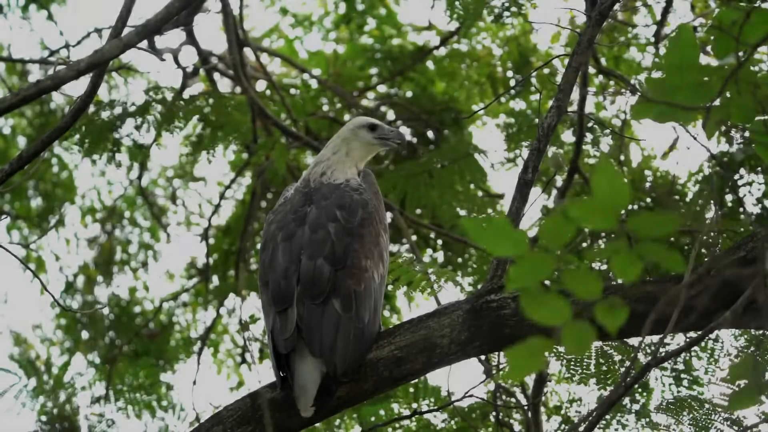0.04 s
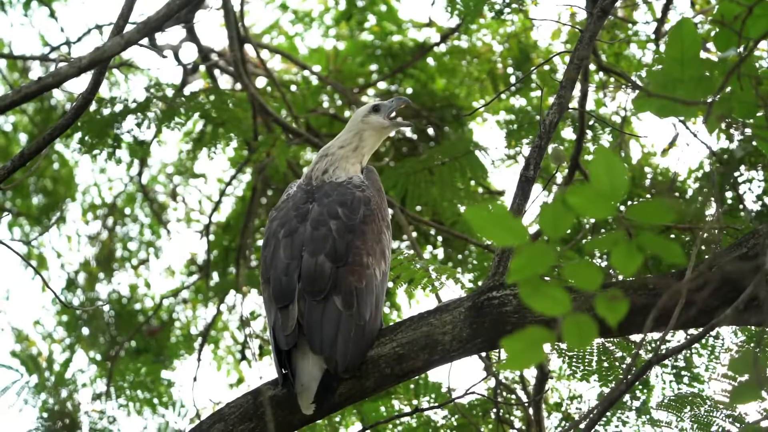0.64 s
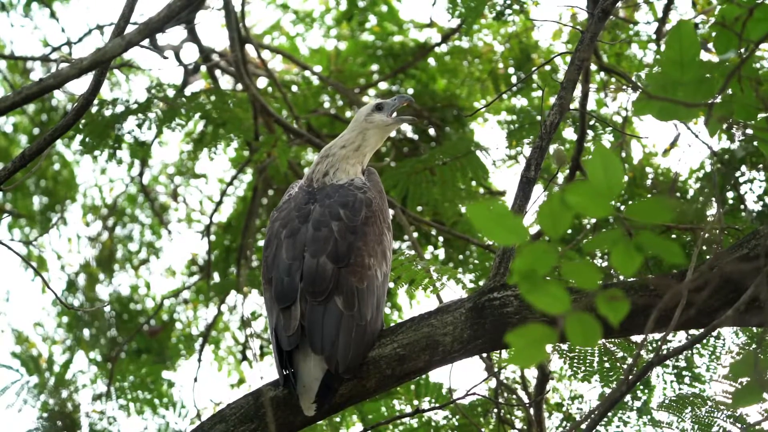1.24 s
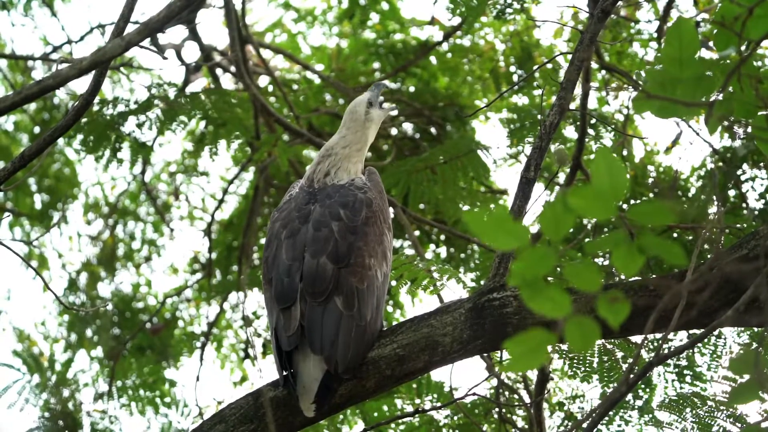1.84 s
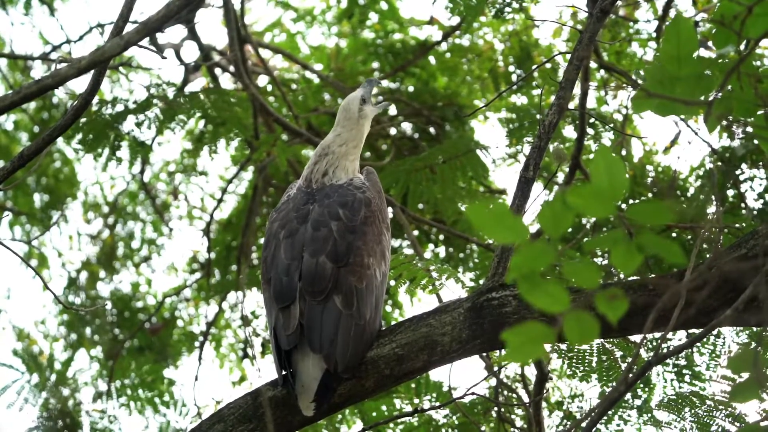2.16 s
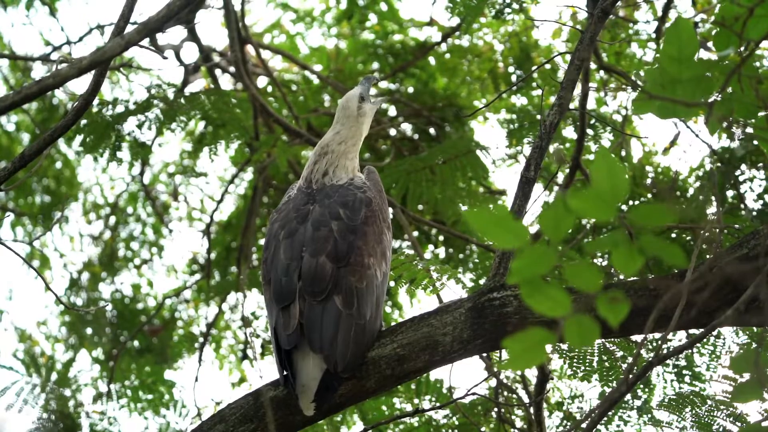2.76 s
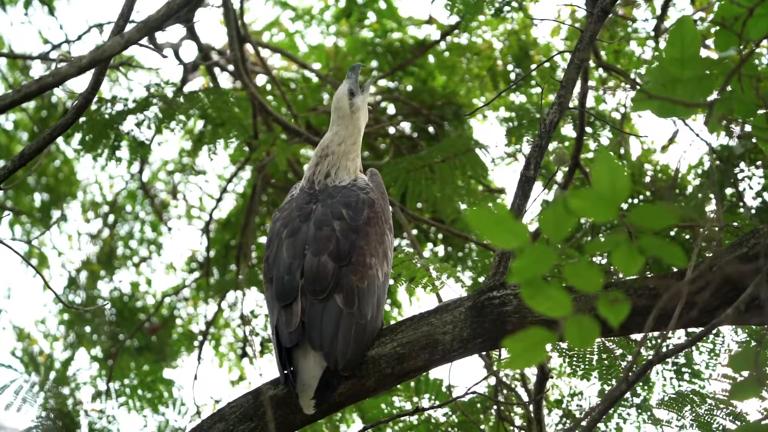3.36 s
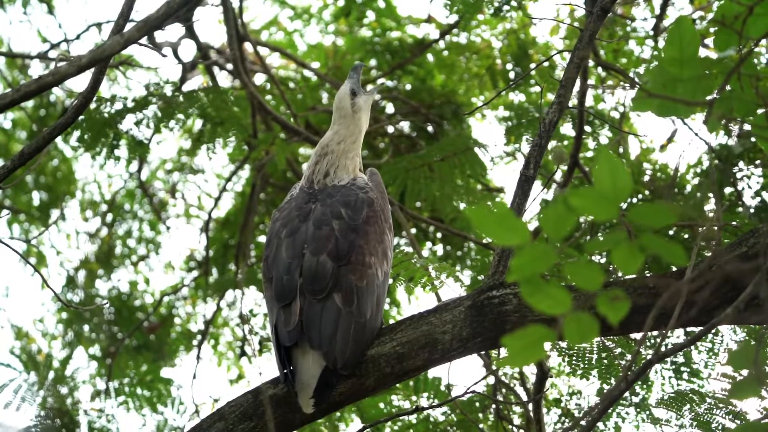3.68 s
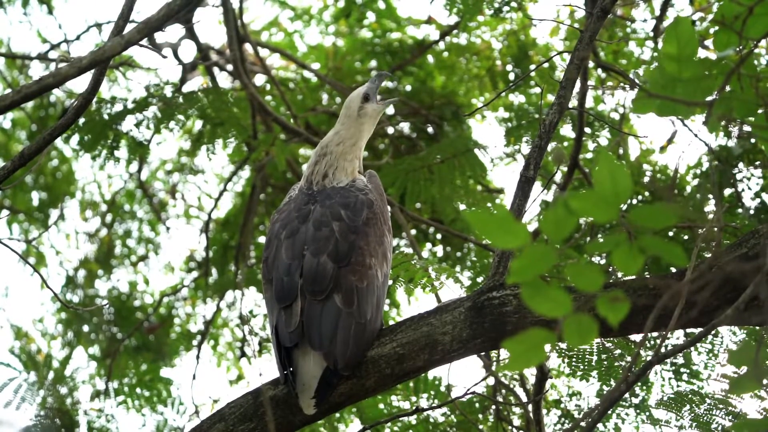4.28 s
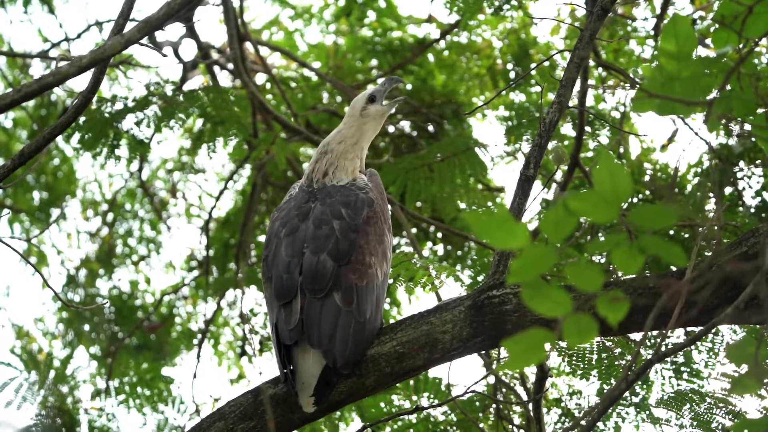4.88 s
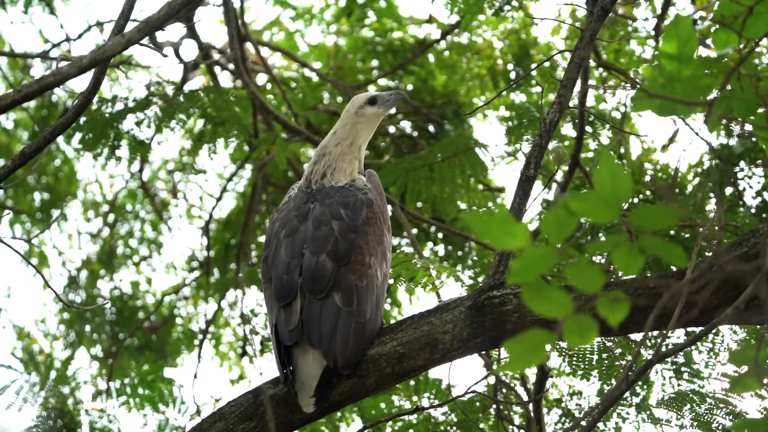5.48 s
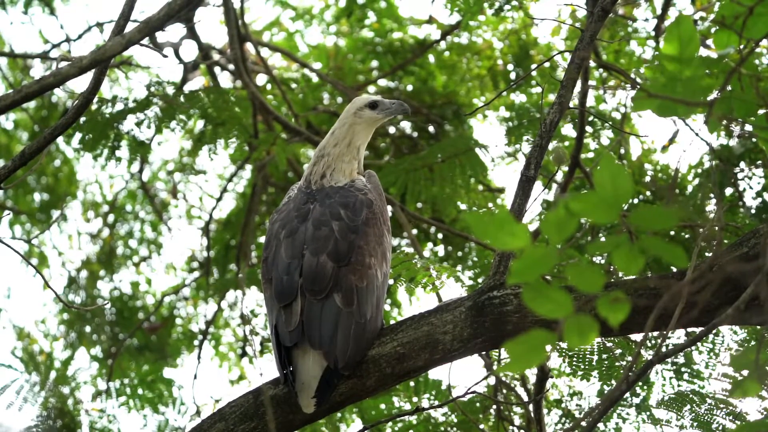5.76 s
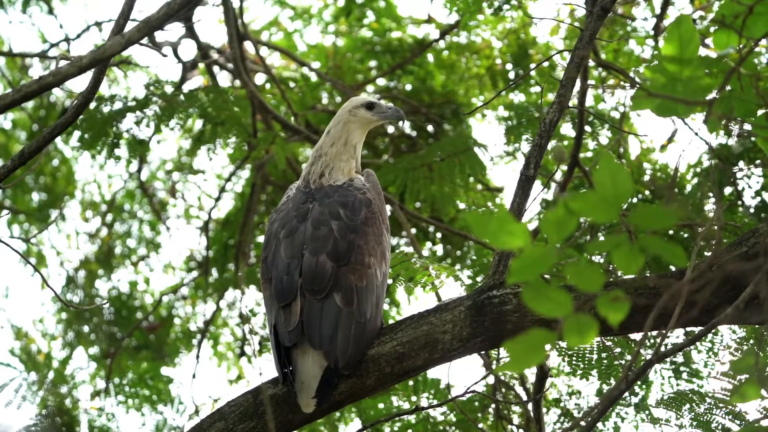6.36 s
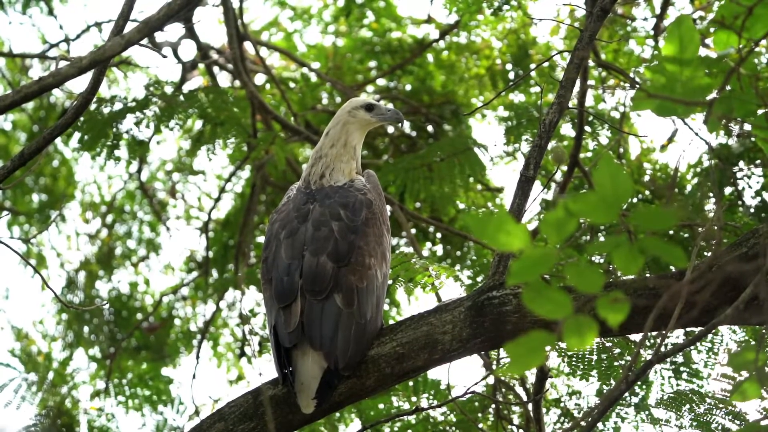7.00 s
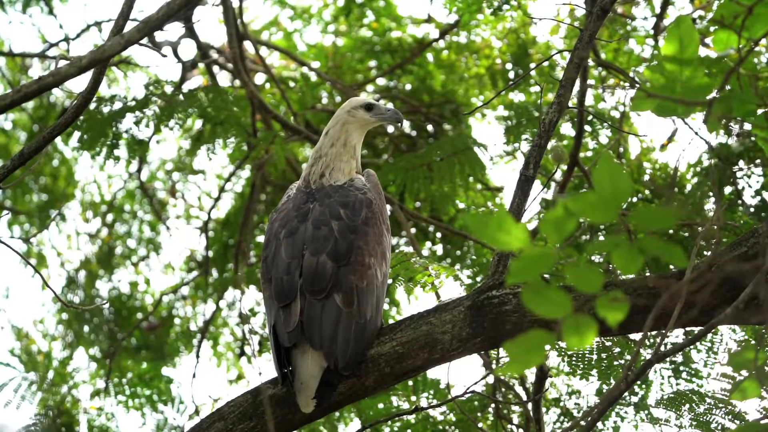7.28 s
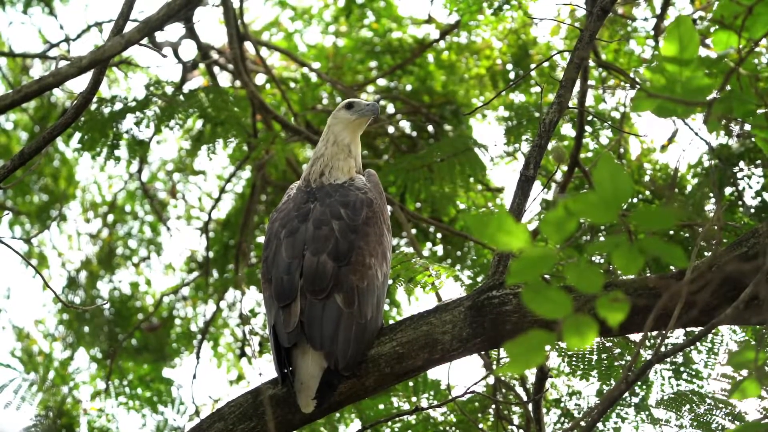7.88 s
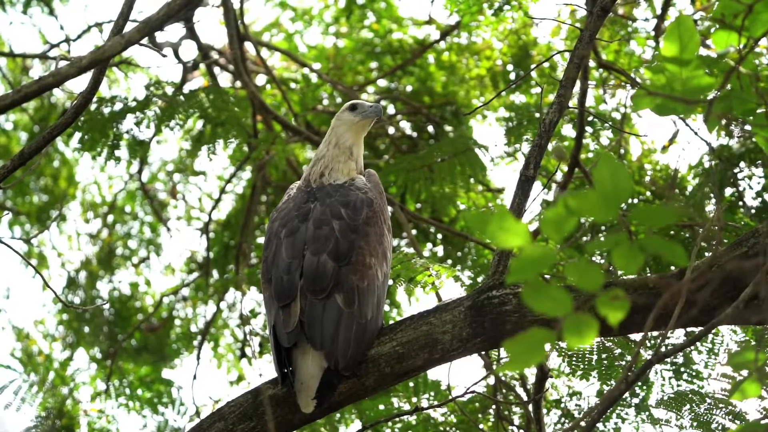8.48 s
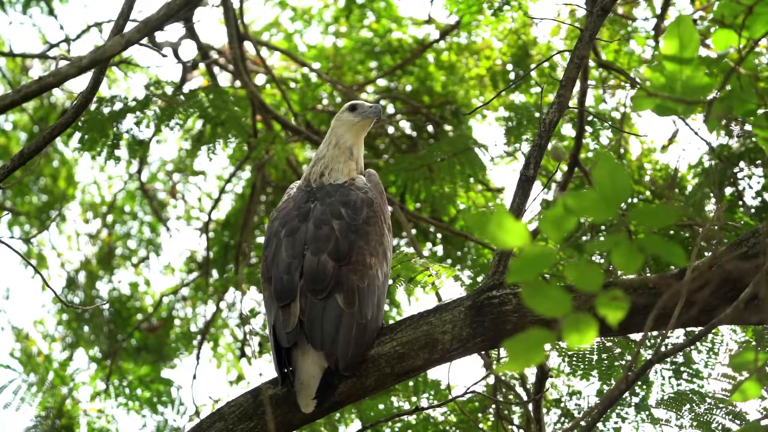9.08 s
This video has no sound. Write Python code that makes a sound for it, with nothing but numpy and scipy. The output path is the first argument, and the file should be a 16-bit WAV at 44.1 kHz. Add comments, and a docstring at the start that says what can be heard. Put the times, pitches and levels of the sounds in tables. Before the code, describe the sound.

An eagle gives loud, harsh honks and yelps outdoors, then a small bird chirps faintly over a distant engine throb.

```python
"""A sea eagle on a branch gives ten honks and four yelps, heard on a stereo microphone in a grove.
Membranes in its syrinx pulse and ring the throat: a honk creaks open, holds a clean pitch arch and
goes slack; a yelp climbs into a squeal and cracks into rasp. The trees scatter the sound back.
Further off a small bird repeats a chirping phrase, and something rustles softly.
Far away an engine throbs through its exhaust, under a wash of traffic and foliage."""
import sys
import numpy as np
from scipy import signal
from scipy.fft import rfft, irfft
from scipy.io import wavfile
from scipy.ndimage import uniform_filter1d, minimum_filter1d

SR = 44100
rng = np.random.default_rng(int(sys.argv[2]) if len(sys.argv) > 2 else 0)


def persist_wave(psi):
    """Save psi, clipped to +-1, as 16-bit WAV."""
    counts = np.round(np.clip(psi, -1, 1) * 32767).astype(np.int16)
    wavfile.write(sys.argv[1], SR, np.atleast_2d(counts).T)


N = 407484
TIME = np.arange(N) / SR
CALL_TIME = np.arange(12288) / SR
CLEAR_ROUGH = .025  # roughness of the eagle's clear voice, 0-1

# Honks from the branch: t/s, creak/s, voice/s, sag/s, top f/Hz, squeal/0-1, strain/0-1,
# then relative level/dB of the low, middle, upper and top register
HONKS = [(.788, .017, 0.08, .012, 438.4, 0.062, 0.92, -11, -17.5, -28, -40),
         (1.028, .014, .085, .011, 434.7, .06, 0.69, -12.5, -19, -30.5, -41),
         (1.291, 0.017, 0.078, .011, 435.2, 0.052, 0.83, -12.5, -19, -29, -40),
         (1.624, .023, .075, .015, 430.2, 0.16, 0.45, -11, -20.5, -31, -44),
         (1.907, .021, 0.099, .011, 433.5, 0.14, 0.55, -12.5, -20.5, -28, -40.5),
         (3.739, 0.025, 0.11, 0.0098, 431.7, 0.2, 0.87, -10, -17, -24.5, -34),
         (4.039, .022, 0.14, 0.0119, 434.5, 0.18, 1, -11.5, -20, -29.5, -36.5),
         (4.378, .019, 0.14, .011, 435, 0.095, 0.64, -12.5, -19.5, -28, -36.5),
         (4.861, 0.019, 0.051, .013, 422.5, 0.18, .3, -12.5, -20, -28.5, -40),
         (5.126, 0.017, 0.15, .010, 436, 0.099, 0.78, -12.5, -17.5, -27.5, -37)]
# Yelps from the branch: t/s, creak/s, clear voice/s, rasp/s, first f/Hz, top f/Hz, squeal/0-1,
# then relative level/dB of the four registers
YELPS = [(.380, .008, 0.035, 0.025, 422, 464.3, 0.16, -14.5, -13, -25.5, -38),
         (2.313, .007, 0.035, 0.044, 390.4, 452.8, 0.37, -14, -18, -27, -38),
         (2.957, .019, .046, 0.02, 403, 428.6, 0.57, -10, -19.5, -29, -36.5),
         (3.301, 0.0051, 0.051, 0.026, 396.4, 451.2, 0.88, -15, -16, -27, -38.5)]
# Late echo of the grove around the microphone: f/Hz, t60/s
GROVE_DECAY = [(400, 0.17), (1300, 0.75), (1720, 1.09), (2200, 1.04), (3000, 1.07), (3480, 1.03),
               (4100, 0.78), (6000, 1.05), (12000, 0.26)]
def eagle(direct_db=-2.5, near_db=-7.0, late_db=-22):
    """The calls reach the microphone directly, in quick echoes from the crown and in the grove's tail."""
    voice, crown = np.zeros(N), np.zeros((2, N))
    for start, sound in [honk(*row) for row in HONKS] + [yelp(*row) for row in YELPS]:
        add(voice, start, sound)
        # the head turns, so each call finds new echoes
        add(crown, start, scatter(sound, [(1500, .26), (9000, .24)], delay_s=.003, treble_db=5.5))
    grove = scatter(voice, GROVE_DECAY, delay_s=.06)
    return gain_of(direct_db) * ports(voice) + gain_of(near_db) * crown + gain_of(late_db) * grove


# Colour of a honk's stages: level/dB added to each of the four registers
BEAK_SHUT_DB = [-2, -5.5, -1.5, -11.5]
STRAIN_DB = [-5.5, 0.5, 1.5, 1.5]  # membranes at their tightest
SLACK_DB = [-17.5, -13, -11, -5]
def honk(start, creak, length, sag, top_hz, squeal, strain, *levels_db):
    """Pitch scoops up as the beak opens, the voice thins at the top of the arch, then sags and breaks."""
    scoop_hz, slack_hz = 22.44, 57.6
    scoop_share, strain_at, strain_width = .202, .6, .18  # shares of the length
    age = np.maximum(CALL_TIME - creak, 0)
    shut = np.exp(-age / (scoop_share * length))
    tight = np.exp(-((age / length - strain_at) / strain_width) ** 2)
    slack = np.exp(np.minimum(age - length, 0) / sag)
    hz = top_hz - scoop_hz * shut - slack_hz * slack
    broken = slack ** 3
    rough = CLEAR_ROUGH + .49 * broken
    colour_db = (np.outer(BEAK_SHUT_DB, shut) + np.outer(STRAIN_DB, strain * tight)
                 + np.outer(SLACK_DB, broken))
    return start, call(creak, length, hz, rough, squeal * (1 - tight), levels_db, colour_db)


# Colour of a yelp's beginning, height and cracked end: level/dB added to each of the four registers
SWELL_DB = [-4.5, -8, -12, -16]
SQUEAL_DB = [-3, 1, 3, -0.5]
RASP_DB = [1, -1, -1, 4]
def yelp(start, creak, clear, rasp, first_hz, top_hz, squeal, *levels_db):
    """Pitch climbs and locks into a squeal as the throat tightens, then cracks into a fading rasp."""
    rise_s, crack_s, tighten_s, fade_db_per_s = .017, .02, .02, -140
    age = np.maximum(CALL_TIME - creak, 0)
    shut = np.exp(-age / rise_s)
    strain = np.minimum(age / clear, 1) ** 2
    tight = ramp(age - .51 * clear, tighten_s)
    cracked = ramp(age - clear, crack_s)
    hz = top_hz + (first_hz - top_hz) * shut
    rough = CLEAR_ROUGH + .8 * cracked
    locked = squeal * (1 - shut) * (1 - .81 * cracked)
    colour_db = np.outer(SWELL_DB, shut) + np.outer(SQUEAL_DB, strain) + np.outer(RASP_DB, cracked)
    fade_db = fade_db_per_s * np.maximum(age - clear, 0)
    return start, call(creak, clear + rasp, hz, rough, locked, levels_db, colour_db + fade_db, tight)


# Borders between the low, middle, upper and top register: f/Hz
REGISTER_EDGES = [2550, 4300, 6000]
# Colour of the slack opening creak: level/dB added to each register
CREAK_DB = [-9.5, -10, -10.5, -14.5]
# Random waver of each register: rms depth/dB
WAVER_DB = [0.67, 1.23, 1.7, 0.93]
def call(creak, length, hz, rough, squeal, levels_db, colour_db, tight=0):
    """A call opens with a creak, then the voice catches; each register follows its own level."""
    attack_s, catch_s, release_s = .0097, .0062, .0057
    creak_hz, creak_rise_hz_per_s, creak_rough = 305.2, 2654, .5
    t = CALL_TIME
    caught = ramp(t - creak, catch_s)
    hz = caught * hz + (1 - caught) * (creak_hz + creak_rise_hz_per_s * t)
    rough = caught * rough + (1 - caught) * creak_rough
    pulses = syrinx(hz, np.clip(rough, 0, 1), np.clip(squeal, 0, 1))
    spectrum = throat(pulses, hz, tight)
    f = np.fft.rfftfreq(len(t), 1 / SR)
    lowpasses = [1 / (1 + (f / edge) ** 24) for edge in REGISTER_EDGES]
    registers = irfft(spectrum * np.diff(lowpasses, axis=0, prepend=0, append=1))
    registers /= np.sqrt(uniform_filter1d(registers ** 2, size=400) + 1e-12)  # each held at unit rms
    register_db = np.array(levels_db)[:, None] + caught * colour_db + np.outer(CREAK_DB, 1 - caught)
    waver_db = np.array([db * drift(len(t), hz=35) for db in WAVER_DB])
    gate = np.minimum(t / attack_s, 1) * np.exp(-np.maximum(t - creak - length, 0) / release_s)
    return gate * (gain_of(register_db + waver_db) * registers).sum(axis=0)


def syrinx(hz, rough, squeal, jitter=.032, flutter_db=3, sideband=1.4):
    """Membrane pulses, uneven and duller when rough; in a squeal every fourth harmonic takes over."""
    size, harmonic = len(hz), np.arange(1, 37)[:, None]
    cycles = np.cumsum(hz * (1 + (.0008 + jitter * rough) * drift(size, hz=142))) / SR
    # high harmonics fall out of step with the pulse, and flutter
    lag = 2 * np.clip((harmonic - 5) / 12, 0, 1) * rng.standard_normal(harmonic.shape)
    flutter_hz = rng.uniform(5, 24, harmonic.shape)
    flutter = np.sin(2 * np.pi * (flutter_hz * TIME[:size] + rng.random(harmonic.shape)))
    strength = gain_of(flutter_db * np.minimum(harmonic / 9, 1) ** 2 * flutter)
    strength *= 1 - rough * (harmonic > 13)
    partials = strength * np.cos(2 * np.pi * harmonic * cycles + lag)
    pulses = unit_rms(partials.sum(axis=0))
    mellow = partials / (1 + (harmonic / 15) ** 4)
    # until the squeal locks, the fifth harmonic rides above it as a sideband
    whistle = unit_rms(mellow[3::4].sum(axis=0) + sideband * (1 - squeal) * mellow[4])
    shimmer = np.exp(rough * drift(size, hz=250))
    voiced = ((1 - squeal) ** 2 * pulses + squeal * (2 - squeal) * whistle) * shimmer
    air = signal.lfilter(*signal.butter(2, 7000, fs=SR), rng.standard_normal(size))
    puffs = unit_rms((.5 + np.exp(-(cycles % 1) / .45)) * air)  # air escapes once a cycle
    return voiced + (.02 + rough) * puffs


# Resonances of windpipe, throat and beak: f/Hz, width/Hz, relative level/dB
THROAT_MODES = [(453, 370, -18.5), (1274, 137, -7.5), (1655, 198, -0.5), (2061, 400, -2.5),
                (2990, 326, -7.5), (3404, 135, -6.5), (3797, 256, -8.5), (4608, 450, -10.5),
                (5290, 750, -19), (6820, 1440, -30), (8400, 1170, -29.5), (10000, 830, -39.5),
                (12600, 3700, -46)]
def throat(drive, hz, tight, lax_scale=.881, tight_scale=1.081, squawk=(2420, 550, -3)):
    """The spectrum at the beak: resonances sit lower when slack; when tight they rise and add a squawk."""
    lax = np.clip((400 - hz) / 70, 0, 1)
    states = [(lax, lax_scale, []), (1 - lax - tight, 1, []), (tight, tight_scale, [squawk])]
    spectrum = 0
    for share, scale, extra in states:
        modes = [(f * scale, width, db) for f, width, db in THROAT_MODES] + extra
        spectrum += rfft(drive * share) * ringing(modes, len(drive))
    return spectrum


# The eagle at the two microphone ports: f/Hz, left minus right level/dB, left phase lead/rad
PORT_BALANCE = [(430, -0.5, -0.29), (1330, 2.5, -0.45), (1700, -4, -0.32), (2450, -10.5, 0.94),
                (3020, 0.5, 0.78), (3330, 4, 1), (3900, 0, -0.46), (4600, 7.5, -1.3), (4930, 0, -1.66),
                (5650, -8, -1.95), (6760, -4, -1.1), (8600, -7, 1), (14100, 4, 0.92)]
def ports(voice):
    """The direct sound reaches the two microphone ports with different colour and delay."""
    f = np.fft.rfftfreq(N, 1 / SR)
    balance_db, lead = curve_at(PORT_BALANCE, f), curve_at(PORT_BALANCE, f, column=2)
    left = gain_of(balance_db / 2) * np.exp(.5j * lead)
    pair = np.array([left, 1 / left])
    return irfft(rfft(voice) * pair / np.sqrt(np.mean(abs(pair) ** 2, axis=0)), N)


def scatter(sound, t60s, delay_s, treble_db=0, echoes_per_s=2500):
    """Sparse echoes off branches and leaves, different on each side, each band dying at its own speed."""
    taps = rng.standard_normal((2, SR)) * (rng.random((2, SR)) < echoes_per_s / SR)
    hz, t, bands = signal.stft(taps * (TIME[:SR] > delay_s), SR, nperseg=256)
    bands *= gain_of(-60 * t / curve_at(t60s, hz)[:, None])
    norm = np.linalg.norm(signal.istft(bands, SR, nperseg=256)[1], axis=1, keepdims=True)
    leaves = gain_of(treble_db * np.clip((hz - 2000) / 5000, 0, 1))  # leaves reflect short waves best
    response = signal.istft(bands * leaves[:, None], SR, nperseg=256)[1] / norm
    return signal.fftconvolve(sound[None], response, axes=1)[:, :N]


# The small bird's phrase: t/s into the phrase, length/s, start f/Hz, end f/Hz, relative level/dB
PHRASE_NOTES = [(0, 0.0338, 5600, 6050, -1.5), (.037, .048, 5960, 6730, 1), (0.161, .024, 5720, 5030, 2)]
# Repeats of the phrase, off among the trees: t/s, relative level/dB
PHRASE_REPEATS = [(5.32, -60), (5.592, -54.5), (5.857, -52), (6.109, -52), (6.368, -48.5), (6.630, -51)]
# Its notes on one pitch: t/s, length/s, f/Hz, relative level/dB
WHISTLES = [(6.133, .095, 3520, -49), (8.15, 0.024, 3460, -51), (8.884, .033, 4930, -53)]
def small_bird(level_db=-2):
    """Thin whistles from further off, blurred by the trees: three slurs repeated, and a few held notes."""
    song = np.zeros(N)
    notes = [(start + offset, length, start_hz, end_hz, db + note_db)
             for start, db in PHRASE_REPEATS for offset, length, start_hz, end_hz, note_db in PHRASE_NOTES]
    notes += [(start, length, hz, hz, db) for start, length, hz, db in WHISTLES]
    for start, length, start_hz, end_hz, db in notes:
        size = round(length * SR)
        slur_hz = start_hz + (end_hz - start_hz) * np.sin(np.linspace(0, np.pi / 2, size))
        waver = 1 + .011 * drift(size, hz=260) + .0126 * drift(size, hz=20)
        note = np.sin(2 * np.pi * np.cumsum(slur_hz * waver) / SR) * signal.windows.tukey(size, .6)
        add(song, start, gain_of(db) * unit_rms(note))
    echoes = scatter(song, [(3000, .28), (8000, .28)], delay_s=.004)
    return gain_of(level_db) * (.55 * song + echoes)


# Soft rustles and bumps under the trees: t/s, rise/s, decay/s, level/dB, centre f/Hz, width/octaves
RUSTLES = [(5.769, 0.0016, 0.017, -42, 6900, 1.7), (5.775, 0.0063, 0.068, -57, 9100, 0.69),
           (6.385, .05, 0.063, -50, 6760, 0.64), (7.048, 0.019, 0.034, -45.5, 9000, 1.6),
           (7.512, 0.033, 0.028, -38.5, 3680, 0.53), (7.512, .02, .045, -50, 8500, 0.72),
           (7.82, 0.057, 0.058, -29.5, 177, 0.35), (8.185, 0.019, .15, -63, 10000, 1)]
def rustles(grain=.18, crossfeed=.13):
    """Brief grainy brushes of noise, spread wide across the microphone."""
    out, t, f = np.zeros((2, N)), TIME[:SR], np.fft.rfftfreq(SR, 1 / SR)
    for start, rise, decay, db, hz, octaves in RUSTLES:
        noise = rng.standard_normal((2, SR)) * np.exp(grain * drift(SR, hz=500))
        colour = np.exp(-.5 * (np.log2((f + 1) / hz) / octaves) ** 2)
        brush = unit_rms(irfft(rfft(noise + crossfeed * noise[::-1]) * colour))
        swell = np.minimum(t / rise, 1) * np.exp(-np.maximum(t - rise, 0) / decay)
        add(out, start, gain_of(db) * swell * brush)
    return out


# Exhaust resonances of the distant engine: f/Hz, width/Hz, relative level/dB
EXHAUST_MODES = [(83, 22.2, -3), (99.24, 9.3, -1), (129.6, 34.5, -8.5), (143.6, 12.9, -5.5)]
# Its rise and fall at the microphone: t/s, relative level/dB
ENGINE_LEVEL = [(0, -22), (.35, -32.5), (1.9, -34.5), (2.7, -29), (3.3, -33), (4, -31), (4.8, -36),
                (6, -32.5), (7.1, -27), (7.6, -30.5), (8, -31.5), (9.24, -35.5)]
def engine(firing_hz=10.85, level_db=-2, uneven=.11, puff_power=.14):
    """A slow engine far away: each firing is a thump and a puff of gas that ring the exhaust."""
    firings = np.cumsum(firing_hz * (1 + .00759 * drift(N, hz=1.4))) / SR
    thumps = np.diff(np.floor(firings), prepend=0) * (1 + uneven * drift(N, hz=7.8))
    puffs = np.exp(-(firings % 1) / .15) * rng.standard_normal(N)
    drive = unit_rms(thumps) + np.sqrt(puff_power) * unit_rms(puffs)
    throb = signal.fftconvolve(drive, irfft(ringing(EXHAUST_MODES, size=32768)))[:N]
    contour_db = np.interp(TIME, *np.transpose(ENGINE_LEVEL))
    return gain_of(level_db + contour_db) * unit_rms(throb)


# Spectrum of the far surroundings: f/Hz, relative level/dB
WASH_SPECTRUM = [(12, -76), (20, -49), (42, -19), (92, -2.5), (140, -6.5), (238, -14), (333, -19),
                 (985, -16), (1300, -22), (2680, -33.5), (3260, -36.5), (3540, -35), (3850, -38),
                 (6540, -43.5), (15500, -58)]
# Likeness of the microphone's two sides: f/Hz, correlation/-1 to 1
WASH_LIKENESS = [(60, 1), (130, .99), (290, 0.94), (640, 0.54), (1410, 0.14), (3100, -0.53), (6800, 0.19),
                 (15000, -0.048)]
# Background level, dipping about 3 dB while the eagle calls, as the recorder's gain ducks:
# t/s, relative level/dB
BACKGROUND_DIP = [(0, 1.5), (1.3, -1.6), (2.7, 0), (4.4, -2), (5.4, -1.6), (6.5, 1), (9.24, 1)]
def wash(level_db=-33, patchy_db=1.39):
    """Distant traffic and foliage: alike on both sides in the bass, diffuse above, in drifting patches."""
    frames, hz = N // 512 + 5, np.fft.rfftfreq(2048, 1 / SR)
    noise = rng.standard_normal((5, frames, len(hz))).transpose(0, 2, 1)
    left, unrelated = noise[0] + 1j * noise[1], noise[2] + 1j * noise[3]
    likeness = np.clip(curve_at(WASH_LIKENESS, hz), -1, 1)[:, None]
    right = likeness * left + np.sqrt(1 - likeness ** 2) * unrelated
    patches = unit_rms(uniform_filter1d(uniform_filter1d(noise[4], size=20, axis=0), size=10, axis=1))
    colour = gain_of(curve_at(WASH_SPECTRUM, hz)[:, None] + patchy_db * patches)
    bed = signal.istft(np.array([left, right]) * colour, nperseg=2048, noverlap=1536)[1][:, :N]
    dip_db = np.interp(TIME, *np.transpose(BACKGROUND_DIP))
    return gain_of(level_db + dip_db) * unit_rms(bed)


def ringing(modes, size):
    """The causal spectrum of a set of steep-sided resonances."""
    f = np.fft.rfftfreq(size, 1 / SR)
    gain = sum(gain_of(db) / (1 + ((f - hz) / width * 2) ** 2) ** 1.54 for hz, width, db in modes)
    log_gain = np.log(np.r_[gain, gain[-2:0:-1]] + 1e-5)
    return np.exp(signal.hilbert(log_gain).conj())[:len(f)]


def drift(size, hz):
    """A smooth random wander of rms about one that changes up to about hz times a second."""
    f = np.fft.rfftfreq(size + SR, 1 / SR)
    return unit_rms(irfft(rfft(rng.standard_normal(size + SR)) * np.exp(-(f / hz) ** 2)))[:size]


def curve_at(points, hz, column=1):
    """One column of a spectrum table, interpolated on a log-frequency axis."""
    columns = np.transpose(points)
    return np.interp(np.log(hz + 1), np.log(columns[0] + 1), columns[column])


def ramp(x, width):
    """Passes from zero to one over a width centred on x = 0."""
    return np.clip(.5 + x / width, 0, 1)


def gain_of(db):
    """Decibels to a factor."""
    return 10 ** (np.asarray(db) / 20)


def unit_rms(x):
    """Scales to an rms of one."""
    return x / np.sqrt(np.mean(x ** 2) + 1e-20)


def add(mix, start, sound):
    """Mixes a sound in at a time in seconds."""
    part = mix[..., round(start * SR):][..., :sound.shape[-1]]
    part += sound[..., :part.shape[-1]]


def scene():
    """Everything that reaches the microphone under the trees."""
    return eagle() + small_bird() + rustles() + engine() + wash()


def record(dry, ceiling=.64, edge_hz=15750):
    """A quick limiter holds the loudest honks down; then the recorder's band limit."""
    gain = np.minimum(1, ceiling / (abs(dry).max(axis=0) + 1e-9))
    held = dry * uniform_filter1d(minimum_filter1d(gain, size=400), size=400)
    lowpass = signal.firwin(511, edge_hz, window=("kaiser", 9), fs=SR)
    return signal.oaconvolve(held, lowpass[None], "same")


dry = scene()
out = record(dry)
persist_wave(out)
```